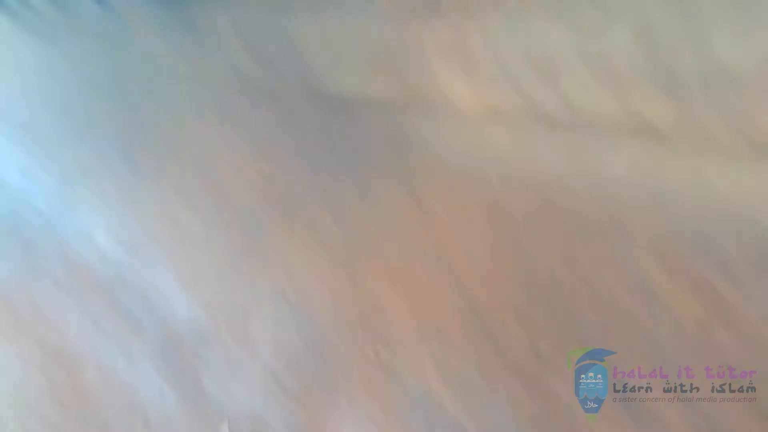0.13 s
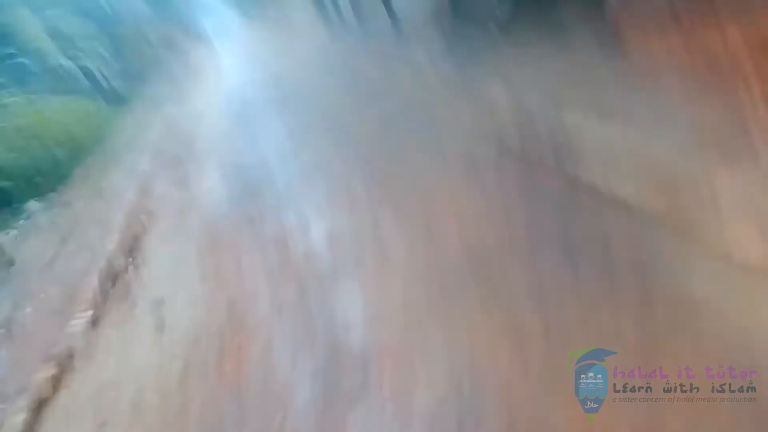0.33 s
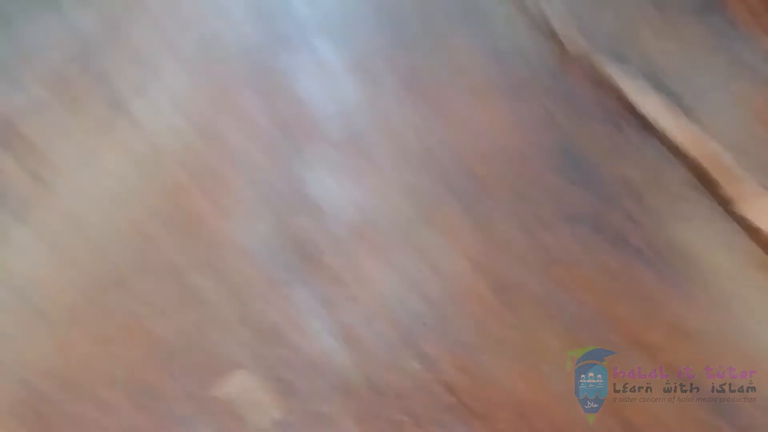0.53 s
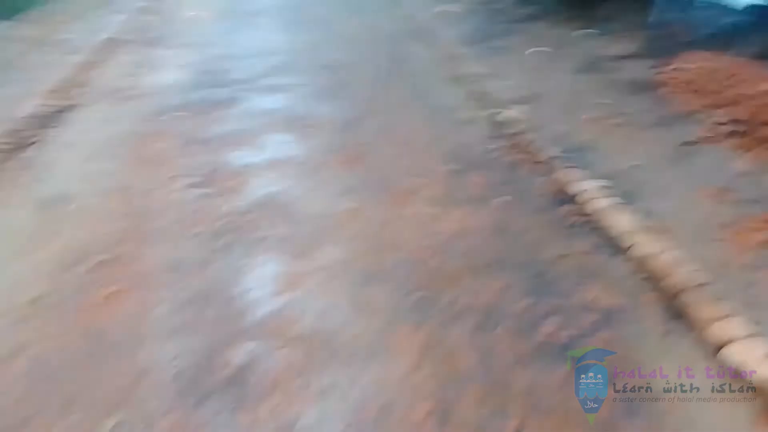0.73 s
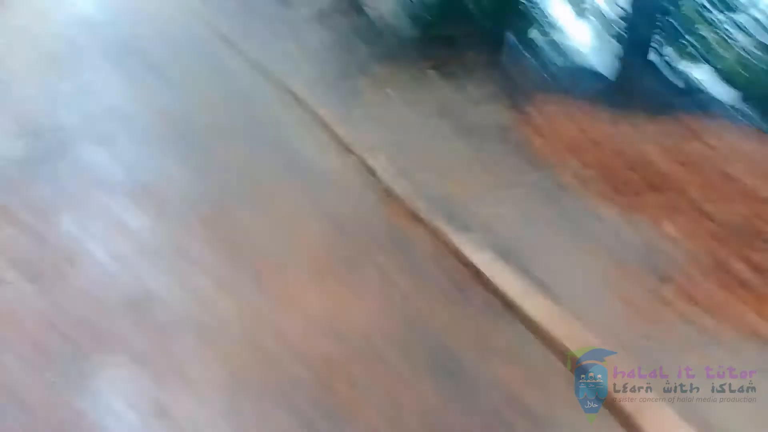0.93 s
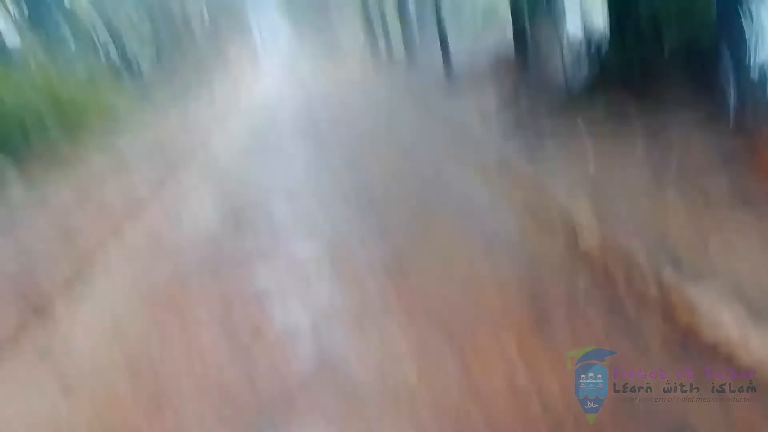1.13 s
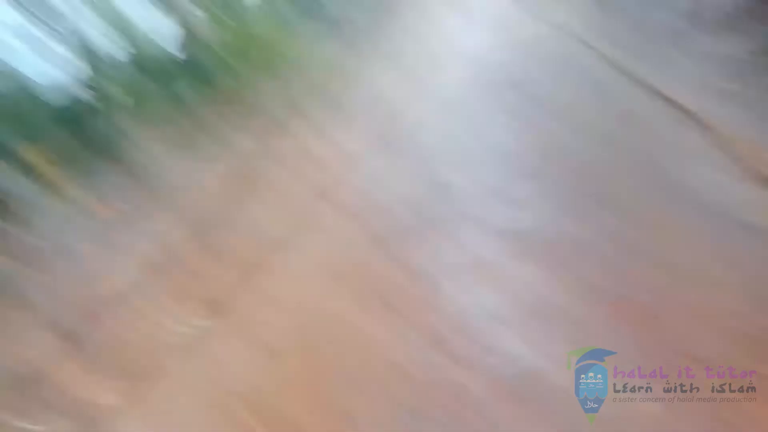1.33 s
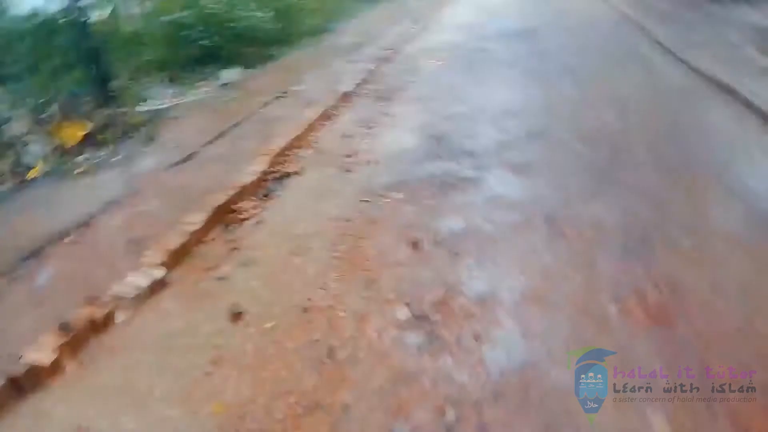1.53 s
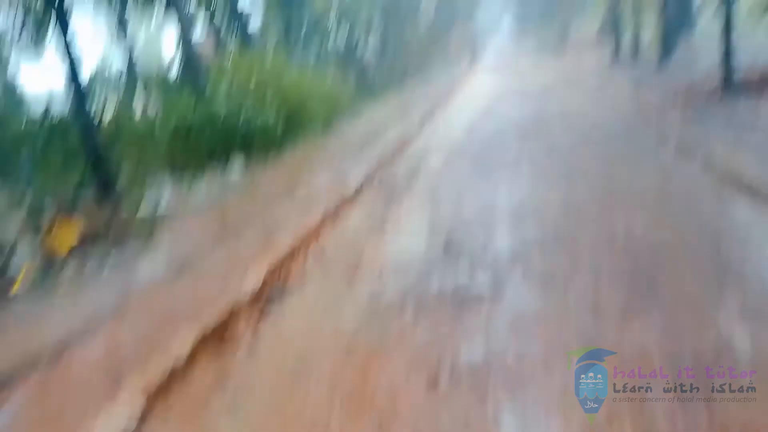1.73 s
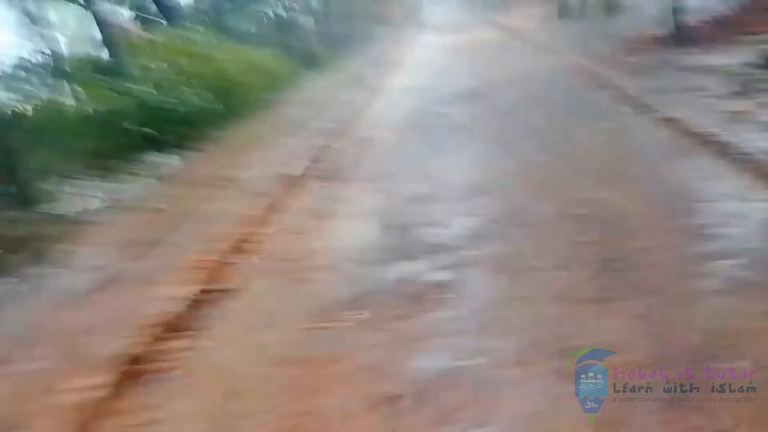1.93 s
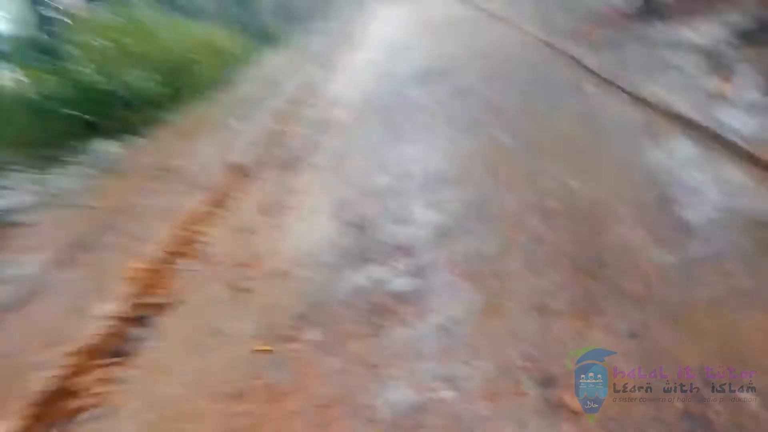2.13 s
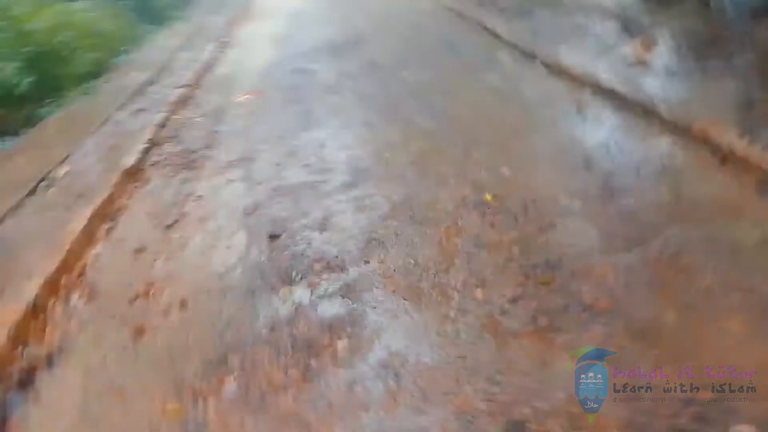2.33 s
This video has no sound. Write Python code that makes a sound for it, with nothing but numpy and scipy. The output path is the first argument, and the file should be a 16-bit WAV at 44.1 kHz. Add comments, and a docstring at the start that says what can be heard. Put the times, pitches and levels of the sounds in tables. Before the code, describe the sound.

Dense rainfall starts suddenly, with small drops pattering all around and big drops thudding on an umbrella overhead

```python
"""Steady rain cuts in after near silence: patter and hiss all around the microphone, under an umbrella.
Countless small drops, as random impacts and noise, drum on the canopy, patter on leaves and hiss on a wet road.
Big drops thud on the taut cloth overhead, as filtered clicks; bubbles plink in puddles, as dying sines.
A few drops splash right by the microphone, as bright noise bursts, over an uneven low rumble.
The hardest splashes make the recorder's look-ahead limiter duck everything for a moment."""
import sys
import numpy as np
from scipy import signal
from scipy.fft import rfft, irfft
from scipy.io import wavfile
from scipy.ndimage import uniform_filter1d, minimum_filter1d

SR = 44100
rng = np.random.default_rng(int(sys.argv[2]) if len(sys.argv) > 2 else 0)


def put_to_file(sound):
    """Save the sound as 16-bit audio at rate SR, in the file named by the first command-line argument."""
    columns = np.atleast_2d(sound).T  # one column per channel
    safe = np.clip(columns, -1, 1)
    whole_steps = np.round(safe * 32767)
    wavfile.write(sys.argv[1], SR, whole_steps.astype(np.int16))


N = 104340
T = np.arange(N) / SR   # time [s]


def from_db(db):
    """Decibels to gain."""
    return 10 ** (np.asarray(db) / 20)


def rms_one(x):
    """Scale to an rms of 1."""
    return x / np.sqrt(np.mean(x ** 2) + 1e-20)


def butter(x, hz, kind, order):
    """Causal Butterworth filter."""
    sections = signal.butter(order, np.minimum(hz, 0.45 * SR), kind, fs=SR, output="sos")
    return signal.sosfilt(sections, x + 1e-18)


def coloured(x, spectrum):
    """Minimum-phase filter with the given spectrum, falling 20 dB per octave for two octaves beyond it; rms 1."""
    hz, db = np.transpose(spectrum)
    octave = np.log2(np.fft.rfftfreq(N, 1 / SR) + 1)
    points = np.log2(hz)
    outside = np.minimum(np.abs(octave - np.clip(octave, points[0], points[-1])), 2)   # octaves
    log_gain = np.log(from_db(np.interp(octave, points, db) - 20 * outside))
    cepstrum = irfft(log_gain, N)
    # folding the cepstrum onto positive times makes the filter causal
    minimum_phase = np.exp(rfft(2 * cepstrum[:N // 2], N) - cepstrum[0])
    return rms_one(irfft(rfft(x) * minimum_phase, N))


def drops(per_s, spread_db):
    """Impacts at random moments, many small and few large."""
    largest_drop = 2.96   # in multiples of the spread
    size = np.minimum(rng.exponential(1, N), largest_drop)
    falls = rng.random(N) < per_s / SR
    return falls * from_db(spread_db * size)


def spray(impacts, decay_s):
    """Every impact sets off a short burst of noise that dies exponentially."""
    power = signal.lfilter([1], [1, -np.exp(-2 / (decay_s * SR))], impacts ** 2 + 1e-18)
    return np.sqrt(power) * rng.standard_normal(len(power))


def with_wash(near, share):
    """Blend separate near drops with the smooth noise of far ones, which take this share of the power."""
    return np.sqrt(1 - share) * rms_one(near) + np.sqrt(share) * rng.standard_normal(N)


def ring(clicks, hz, t60):
    """A two-pole resonator: a unit click sets a sine ringing that starts at height 1 and falls 60 dB in t60."""
    radius = from_db(-60 / (t60 * SR))
    turn = 2 * np.pi * hz / SR
    return signal.lfilter([0, np.sin(turn)], [1, -2 * radius * np.cos(turn), radius ** 2], clicks + 1e-18)


def rain():
    """Drumming, patter with plinks, and hiss, each swelling and thinning along its own level curve."""
    # the shower as it rises and falls: (time [s], bass level [dB], middle level [dB], treble level [dB])
    rain_levels = [(.87, -30.5, -26, -29), (.95, -28, -24.5, -28.5), (1.0, -26.5, -25, -27),
                   (1.14, -26, -24.5, -27), (1.26, -24.5, -23, -24), (1.34, -28.5, -22.5, -28),
                   (1.42, -29.5, -26.5, -29), (1.5, -26.5, -21.5, -26), (1.56, -24, -29, -29.5),
                   (1.66, -24, -23, -25.5), (1.74, -24.5, -22, -26), (1.82, -24.5, -22.5, -25.5),
                   (1.88, -22.5, -21.5, -26.5), (1.97, -24.5, -22.5, -29.5), (2.07, -21.5, -22, -25.5),
                   (2.18, -18, -22.5, -26.5), (2.27, -18.5, -25, -25.5), (2.36, -20, -22.5, -26.5)]
    plink_db = -7.5   # relative to the patter
    times, *levels = np.transpose(rain_levels)
    bass, middle, treble = [from_db(np.interp(T, times, db)) for db in levels]
    leaves_and_puddles = patter() + from_db(plink_db) * plinks()
    return bass * drumming() + middle * leaves_and_puddles + treble * hiss()


def drumming():
    """Small drops kick the canopy overhead up or down, coloured by the cloth; rms 1."""
    # spectrum of drops on the cloth: (frequency [Hz], relative density [dB per Hz])
    drum_colour = [(25, -33), (80, -15.5), (130, -9), (200, -3.5), (300, -2), (580, 1.5), (1000, -2.5),
                   (1400, -7.5), (2000, -9)]
    kicks = drops(per_s=800, spread_db=2.5) * rng.choice([-1, 1], N)
    return coloured(with_wash(kicks, share=0.35), drum_colour)


def patter():
    """Small drops tap the leaves with either sign, coloured around the middle of the spectrum; rms 1."""
    # spectrum of drops on leaves: (frequency [Hz], relative density [dB per Hz])
    patter_colour = [(700, -23), (1200, -4), (1700, -3), (2150, 1), (2800, -4), (3600, -7), (4600, -16),
                     (7000, -23)]
    taps = drops(per_s=1300, spread_db=2.5) * rng.choice([-1, 1], N)
    return coloured(with_wash(taps, share=0.46), patter_colour)


def hiss():
    """Tiny drops burst into spray on the wet road and merge into a treble hiss; rms 1."""
    # spectrum of spray on the road: (frequency [Hz], relative density [dB per Hz])
    hiss_colour = [(3000, -6), (4500, -1.5), (6500, -2.5), (9500, 0), (12000, -2), (15500, -5.5)]
    bursts = spray(drops(per_s=2500, spread_db=5.5), decay_s=0.0013)
    return coloured(with_wash(bursts, share=0.48), hiss_colour)


def plinks():
    """Drops into puddles trap bubbles that ring briefly, each at one of a set of pitches; rms 1."""
    count, low_hz, high_hz = 28, 850, 3523
    t60_cycles = 52   # higher pitches die sooner
    impacts = drops(per_s=150, spread_db=1.5)
    dealt = rng.integers(0, count, N)   # which pitch an impact excites
    total = np.zeros(N)
    for k, hz in enumerate(np.geomspace(low_hz, high_hz, count)):
        total += ring(impacts * (dealt == k), hz, t60_cycles / hz)
    return rms_one(total)


def thuds():
    """A big drop slaps the damped cloth and pushes it in; it swings back once and rings faintly."""
    # big drops on the canopy overhead: (time [s], level of the cloth's swing [dB], brightness [Hz])
    big_drops = [(0.8854, -14.5, 710), (.9058, -10.5, 860), (.9171, -0.5, 830), (.9408, -7, 900),
                 (.9746, -9.5, 850), (.9834, -3, 970), (1.0097, -4.5, 900), (1.0699, -5, 704),
                 (1.1221, -8, 950), (1.1995, -2, 815), (1.2412, -8, 850), (1.2466, -8.5, 795),
                 (1.2632, 1.5, 630), (1.3457, -12, 850), (1.3567, -2, 850), (1.3629, -9.5, 754),
                 (1.3721, -3, 850), (1.4285, -3.5, 706), (1.4332, -8.5, 700), (1.583, -4.5, 630),
                 (1.6291, -5.5, 770), (1.6598, -9, 1500), (1.6824, -6.5, 2000), (1.6966, -10.5, 810),
                 (1.7093, -7, 1100), (1.76, -6.5, 1000), (1.7847, -7, 736), (1.79, -11.5, 815),
                 (1.7931, -7.5, 830), (1.828, -11, 1210), (1.8509, -4.5, 690), (1.8603, -4, 850),
                 (1.9799, -7, 850), (1.9978, -4.5, 730), (2.1201, -10, 720), (2.1295, -7, 770),
                 (2.1498, -7, 710), (2.1705, -8, 820), (2.1783, -21, 820), (2.1867, -1.5, 870),
                 (2.1965, -7.5, 900), (2.2002, -4.5, 1080), (2.27, 0, 840), (2.2796, 1.5, 900),
                 (2.3136, -12, 930)]
    canopy_low_hz = 273   # the cloth radiates little below this
    ring_hz, ring_t60_s, ring_db = 2200, 0.0041, -25   # pitch is the mean; dB relative to the swing
    slap_db, slap_decay_s, slap_band_hz = -17.5, 0.0024, [900, 2980]   # dB relative to the swing
    out = np.zeros(N + SR)
    click = signal.unit_impulse(SR // 20)
    t = np.arange(len(click)) / SR
    for time, db, bright_hz in big_drops:
        push = butter(click, bright_hz, "low", order=3)
        swing = -butter(push, canopy_low_hz, "high", order=3)
        swing = swing / np.abs(swing).max()
        cloth_ring = from_db(ring_db) * ring(click, ring_hz * rng.normal(1, 0.17), ring_t60_s)
        slap_noise = rms_one(butter(rng.standard_normal(len(t)), slap_band_hz, "band", order=2))
        slap = from_db(slap_db) * slap_noise * np.exp(-t / slap_decay_s)
        i = int(time * SR)
        out[i:i + len(t)] += from_db(db) * (swing + cloth_ring + slap)
    return out[:N]


def with_road_echo(x):
    """The wet road throws the thuds back up as one late, quieter copy."""
    echo_s, echo_db = 0.0092, -16
    return x + from_db(echo_db) * np.interp(T - echo_s, T, x)


def splashes():
    """Right by the microphone: a bright tick as the drop lands, then its spray a moment later."""
    # close splashes: (time [s], base level of tick and spray [dB], centre frequency [Hz])
    close_drops = [(.9073, -12.5, 10500), (1.1138, -20, 11000), (1.2066, -2.5, 11500), (1.575, -21, 9500),
                   (1.695, -15, 8500), (1.718, -18, 11000), (1.734, -17, 11000), (1.847, -15, 8100),
                   (1.855, -26, 13000), (2.095, -18.5, 11000), (2.2561, -6.5, 11700), (2.323, -13, 11000)]
    tick_db, spray_db = 6, 6.5   # above the base level, before the band filter
    spray_lag_s, decay_s = 0.0026, 0.0015
    width = 1.287   # ratio of the band's edges to its centre
    out = np.zeros(N + SR)
    for time, db, hz in close_drops:
        impacts = np.zeros(SR // 20)
        impacts[0] = from_db(db + tick_db)
        impacts[int(spray_lag_s * SR)] = from_db(db + spray_db)
        burst = butter(spray(impacts, decay_s), [hz / width, hz * width], "band", order=1)
        i = int(time * SR)
        out[i:i + len(burst)] += burst
    return out[:N]


def near_plink():
    """One drop plinks close to the microphone, a single dying sine."""
    # the plink: (time [s], level [dB], pitch [Hz], time to fall 60 dB [s])
    close_plink = (1.6808, -16.5, 3100, 0.05)
    time, db, hz, t60 = close_plink
    return from_db(db) * ring(signal.unit_impulse(N, int(time * SR)), hz, t60)


def rumble():
    """An uneven low rumble under the rain: coloured noise along a level curve."""
    # course of the rumble, before the trim: (time [s], level [dB])
    rumble_level = [(0.88, -51), (0.904, -38.5), (1.082, -34), (1.204, -49), (1.254, -38), (1.538, -40),
                    (1.568, -35), (1.972, -49), (1.988, -46), (2.338, -25), (2.36, -55)]
    # spectrum of the rumble: (frequency [Hz], relative density [dB per Hz])
    rumble_colour = [(25, -21), (55, -17), (100, -3), (155, 3), (230, -9)]
    trim_db = 0.5
    times, db = np.transpose(rumble_level)
    level = from_db(np.interp(T, times, db) + trim_db)
    return level * coloured(rng.standard_normal(N), rumble_colour)


def scene():
    """All the rain, cutting in out of silence."""
    start_s, fade_in_s = 0.870, 0.0035
    sound = rain() + with_road_echo(thuds()) + splashes() + near_plink() + rumble()
    return (sound * np.clip((T - start_s) / fade_in_s, 0, 1))[None]


def limiter(x):
    """Sharp treble peaks turn the gain down ahead of time; it holds, then recovers steadily."""
    limit_db, release_db_per_s = -15.5, 100
    look_ahead_s, hold_s, attack_s = 0.046, 0.021, 0.0044
    treble = butter(x, 4000, "high", order=2)
    power = uniform_filter1d(treble ** 2, size=176)   # averaged over 4 ms
    over_db = np.maximum(10 * np.log10(np.abs(power) + 1e-12) - limit_db, 0)
    ahead = int(look_ahead_s * SR)
    span = int((look_ahead_s + hold_s) * SR)
    # the largest excess from the hold time behind to the look-ahead in front
    held = -minimum_filter1d(-over_db, span, origin=(span - 1) // 2 - ahead)
    # a running maximum on a rising ramp lets the cut shrink only at the release rate
    ramp = release_db_per_s * T
    cut_db = np.maximum.accumulate(held + ramp) - ramp
    return x * from_db(-uniform_filter1d(cut_db, int(attack_s * SR) + 1))


def record(dry):
    """Limiter, the input waking with faint noise and an offset, a hard ceiling and a steep top cut."""
    input_on_s, noise_db = 0.13, -99
    offset_db, offset_rise_s = -49.5, 0.1
    cutoff_hz = 15700
    offset = from_db(offset_db) * np.clip((T - input_on_s) / offset_rise_s, 0, 1)
    noise = from_db(noise_db) * rng.standard_normal(N) * (T >= input_on_s)
    x = np.clip(limiter(dry[0]) + offset + noise, -1, 1)
    top_cut = signal.ellip(14, 0.1, 80, cutoff_hz, fs=SR, output="sos")
    return signal.sosfilt(top_cut, x)[None]


dry = scene()
out = record(dry)
put_to_file(out)
```